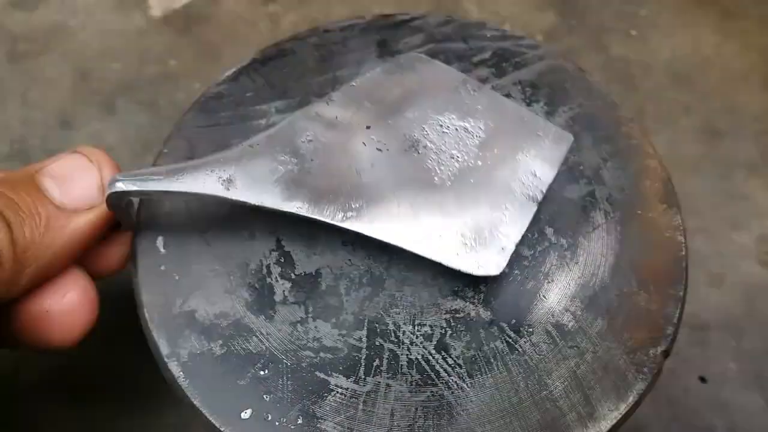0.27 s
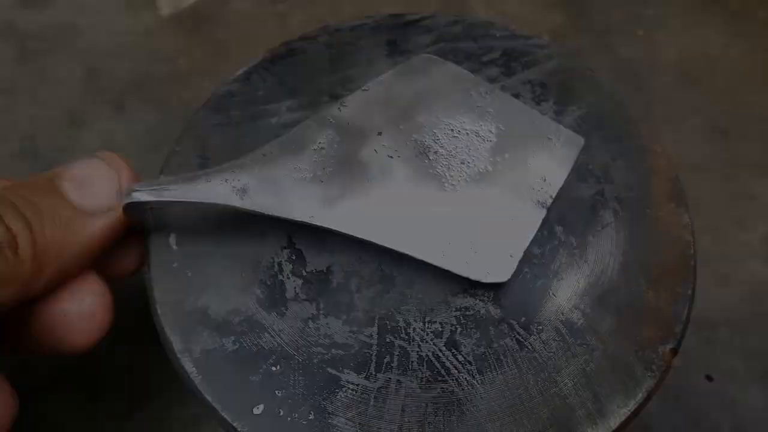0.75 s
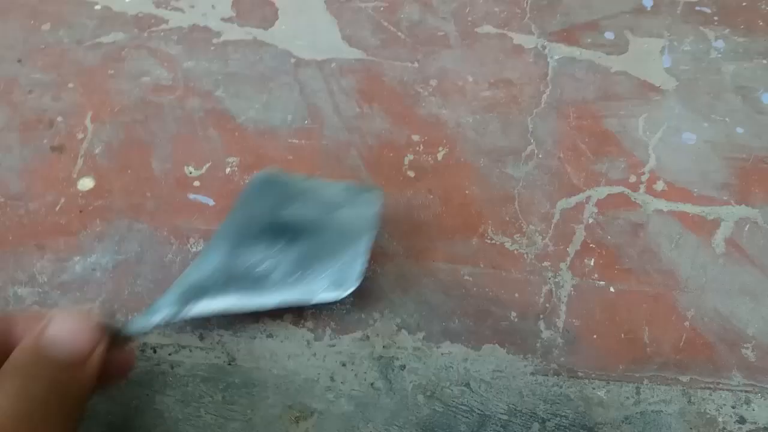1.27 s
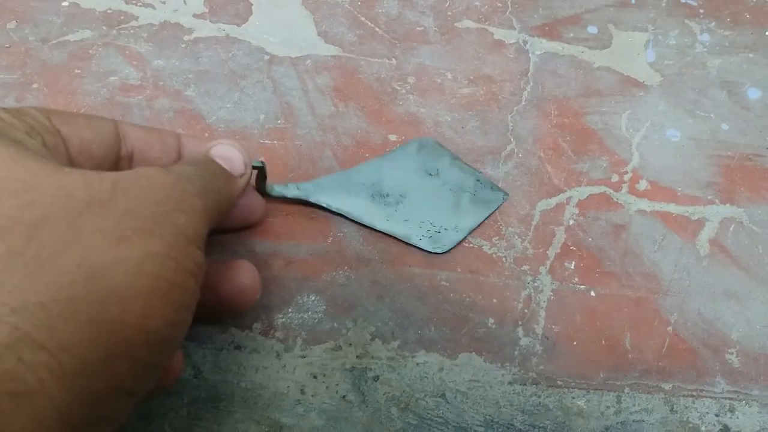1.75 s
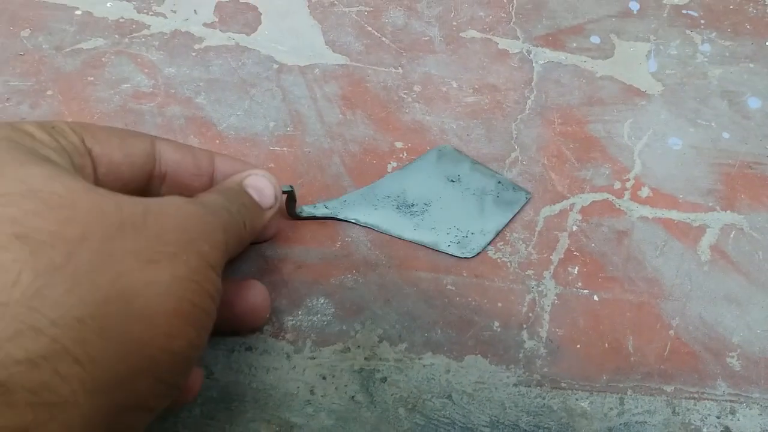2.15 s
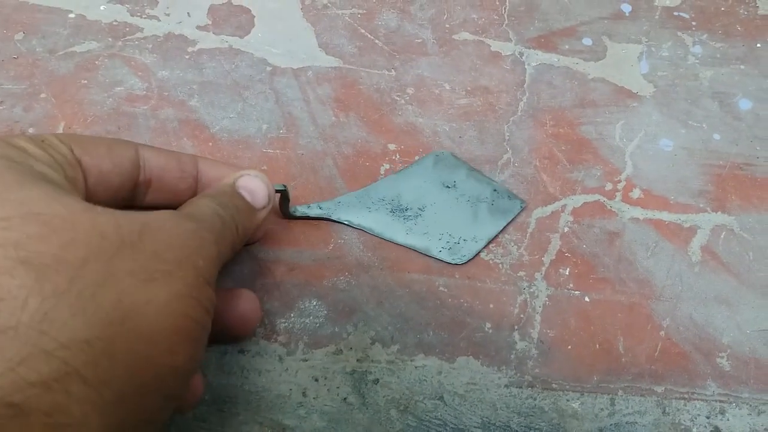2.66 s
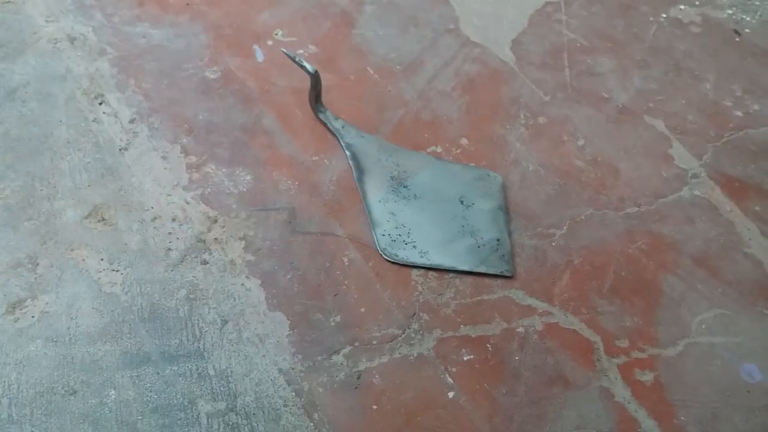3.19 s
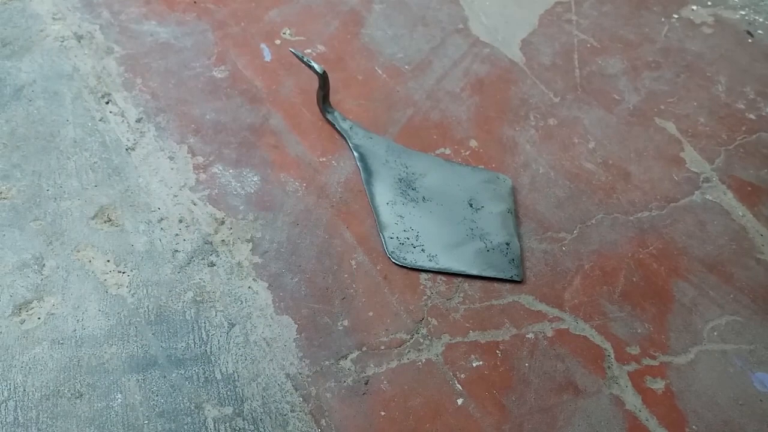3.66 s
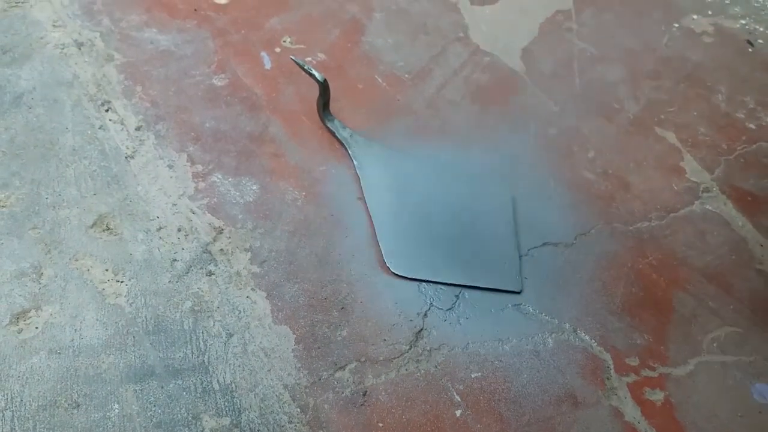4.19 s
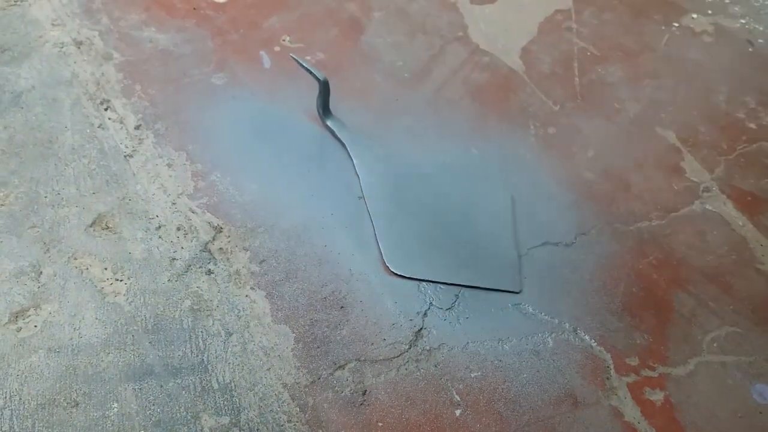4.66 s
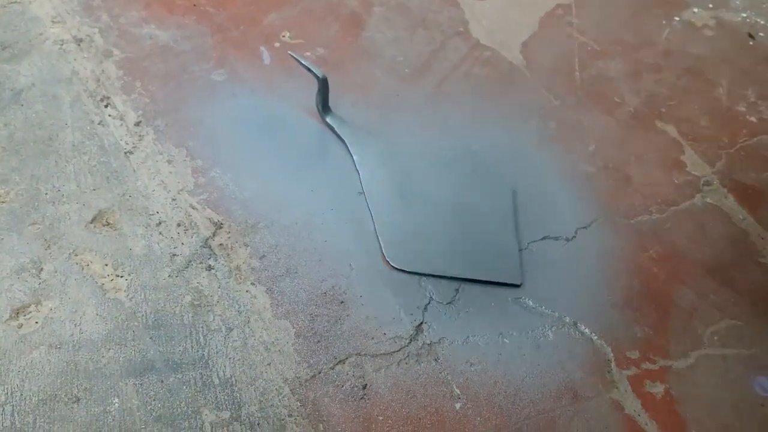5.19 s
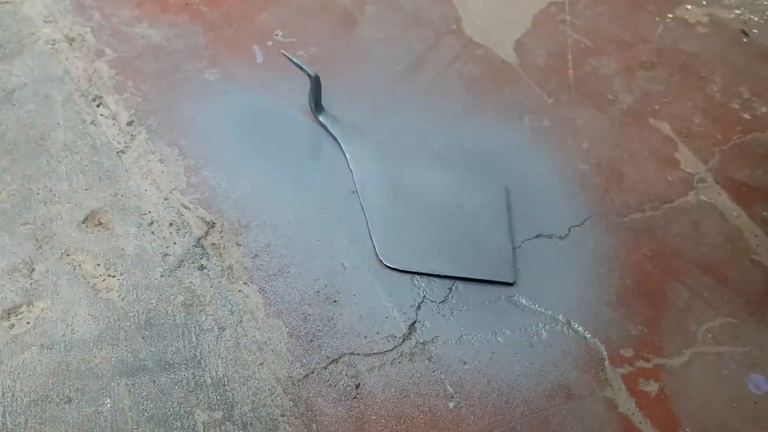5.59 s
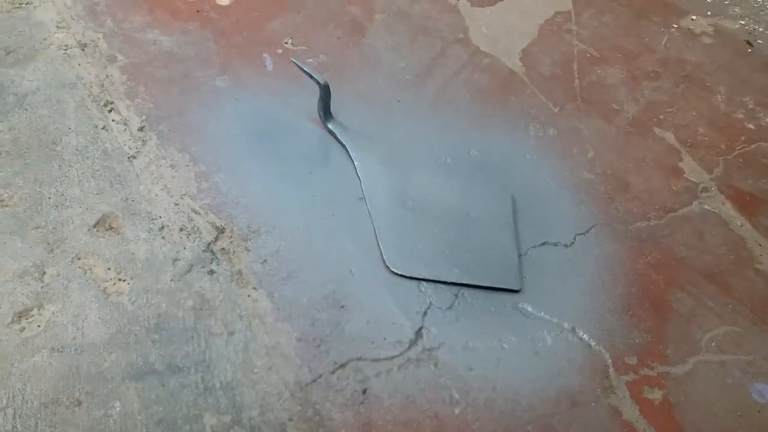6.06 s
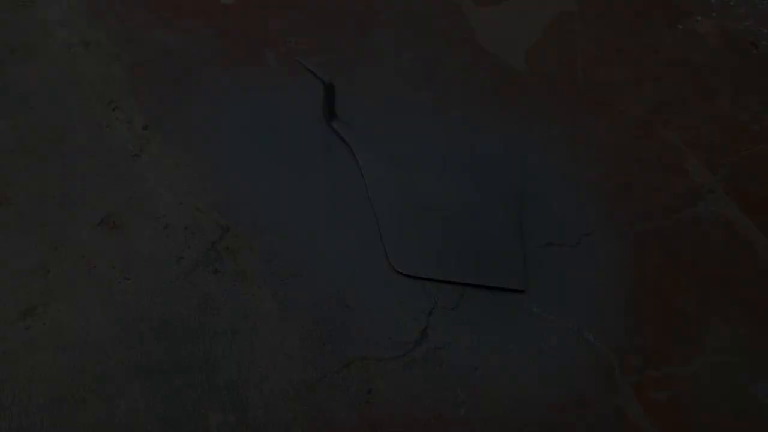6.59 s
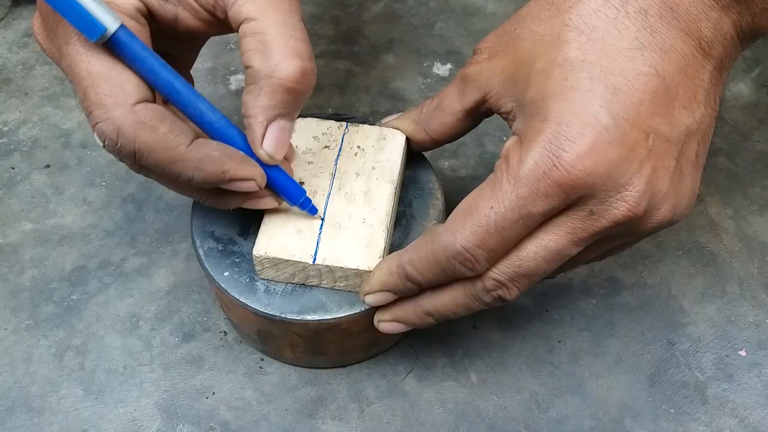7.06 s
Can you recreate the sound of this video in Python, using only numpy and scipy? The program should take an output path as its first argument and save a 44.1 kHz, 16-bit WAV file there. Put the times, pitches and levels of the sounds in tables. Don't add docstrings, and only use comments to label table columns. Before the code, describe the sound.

In a quiet concrete-floored workshop, small metal ticks sound as a flat metal piece is turned. A spray can is shaken in about six strokes, paint sloshing and the mixing ball knocking and rolling. After an abrupt change the nozzle gives a steady turbulent hiss for two seconds, sweeping twice. Hand scuffs and cap ticks follow, then a bare room with a faint fan and insect. Close stereo microphones, low rumble throughout.

```python
import sys
import numpy as np
from scipy import signal
from scipy.fft import rfft, irfft, next_fast_len
from scipy.io import wavfile
from scipy.ndimage import uniform_filter1d

SR = 44100
rng = np.random.default_rng(int(sys.argv[2]) if len(sys.argv) > 2 else 0)


def master_out(mix):
    frames = np.transpose(np.atleast_2d(mix))
    ceiling = np.clip(frames, -1, 1)
    pcm = np.round(ceiling * 32767).astype(np.int16)
    wavfile.write(sys.argv[1], SR, pcm)


def gain_from_decibels(decibels):
    exponent = np.asarray(decibels, float) / 20
    return 10 ** exponent


N = 323496
PADDED = next_fast_len(N + SR // 2)
BINS_HZ = np.fft.rfftfreq(PADDED, 1 / SR)
CUTOFF_HZ = 15850
SCENE_CHANGES_S = 3.172, 6.712

# start t/s, swell/s, peak level/dB, fall/s, fizz level/dB
STROKES = [(0.962, 0.13, -61.5, 0.022, -5), (1.078, 0.08, -32, 0.11, -1.5), (1.235, 0.041, -64, 0.07, 0),
           (1.433, 0.077, -35, 0.092, -4), (1.769, 0.043, -34, 0.095, -13), (2.112, 0.089, -37, 0.071, -3),
           (2.33, 0.018, -71, 0.13, -17), (2.471, 0.081, -35.5, 0.076, 0.5),
           (2.685, 0.0078, -62.5, 0.019, 10), (2.718, 0.0033, -59, 0.02, 8), (2.837, 0.032, -46.5, 0.09, 1),
           (2.828, 0.088, -38, 0.11, 2.5), (3.014, 0.028, -43, 0.063, -11), (3.04, 0.024, -61, 0.032, 24)]
# f/Hz, width/Hz, level/dB
CAN_WALL = [(3160, 120, -20.5), (3640, 130, 6.5), (3866, 330, 3), (4400, 1080, 1.5), (4330, 120, -0.5),
            (4555, 140, -5.5), (5020, 100, -0.5), (5300, 140, 2), (5820, 340, -7.5)]
# f/Hz, left level/dB, right level/dB, left lead/rad, direct share/0-1
SLOSH_PATH = [(587, -19, -21.5, 0.18, 0.65), (983, -32, -32, 0.5, 0.33), (1770, -25, -27, 1.0, 0.96),
              (2380, -20, -12, 4.6, 0.4), (3240, -6.5, -4.5, 3.74, 0.38), (3530, -16.5, -5, 5.3, 0.35),
              (4800, -12.5, -3.5, 7.26, 0.17), (6900, -23.5, -12, 10.4, 0.021),
              (9600, -27, -33.5, 14, 0.089), (10140, -29, -24, 8.4, 0.2), (11540, -26.5, -36.5, 42, 0.08),
              (13800, -27.5, -28.5, 31, 0.2), (15860, -28.5, -23.5, 16, 0.28)]
# t/s, level/dB
ROLL = [
    (1.578, -32),
    (1.599, -54.5),
    (1.63, -42.5),
    (1.687, -37),
    (1.717, -43.5),
    (1.741, -39),
    (1.763, -47),
    (1.78, -36),
]
# t/s, lower f/Hz, lower level/dB, upper f/Hz, upper level/dB
ROLL_MODES = [(1.585, 4330, 1.5, 5900, -1.5), (1.63, 4370, 2, 5930, -4), (1.66, 4330, -8, 5700, -3),
              (1.675, 4170, -2, 5740, -5.5), (1.715, 4210, 0.5, 5300, 3.5), (1.735, 4760, 2, 5300, -3),
              (1.765, 4900, 0, 6030, -4)]
# f/Hz, left level/dB, right level/dB, left lead/rad, direct share/0-1
ROLL_PATH = [(1230, -18, -24, -14.5, 0.35), (1981, -18, -16.5, 4.5, 0.38), (2890, 1, 1.5, -3.5, 0.7),
             (3270, -20.5, -11.5, -3.5, 0.065), (4220, -19.5, 5.5, 7, 1), (4800, -24.5, -2, 8.5, 0.29),
             (5900, -29.5, 3, 8.5, 0.4), (7060, -31, -14, 8, 0.19), (8100, -21, -5, 6.5, 0.5),
             (9190, -4.5, -3, 13.5, 0.87), (10160, -21, -25, 17, 0.93), (11300, -17.5, -20, 12.5, 0.5),
             (12680, -14, -18, 10, 0.54), (16030, -8.5, -11.5, 6.5, 0.31)]

# t/s, jet level/dB
SPRAY = [(3.6, -100), (3.625, -89), (3.644, -64.5), (3.684, -54.5), (3.714, -51), (3.728, -42),
         (3.8, -40.5), (4.08, -41.5), (4.92, -42.5), (5.3, -44), (5.58, -48.5), (5.66, -52.5), (5.8, -87)]
# t/s, place/0 far to 1 near
SWEEP = [(3.68, 0), (3.9, .02), (3.93, .11), (3.97, .03), (4.1, .1), (4.14, .04), (4.18, .55), (4.3, .8),
         (4.42, 1), (4.54, .85), (4.6, .7), (4.66, .3), (4.73, 0), (4.92, .02), (4.96, .1), (5.04, .03),
         (5.14, .7), (5.3, 1), (5.45, .85), (5.62, .35)]
# f/Hz, left level/dB, right level/dB
JET_FAR = [(577, -12.5, -7), (1670, -4.5, -4.5), (1890, 6.5, 1.5), (2600, 6.5, 3.5), (3100, 7.6, 6.5),
           (4200, -0.5, 8.5), (4970, 2.5, 0.7), (5700, -5, 12), (6720, 4, -3), (7670, -4.5, 5.5),
           (8400, 4, -16), (9400, -8, 1.5), (9900, -6, 1), (10200, -3, 2), (11530, 2.5, 0.5),
           (13510, 2.5, -15), (13670, -25, 16), (14400, 9.5, -0.5), (16240, 1.5, -28)]
JET_NEAR = [(586, -3.5, -10.5), (1600, -4.5, -1.5), (1804, 12.5, 0.5), (2700, 13, 10.5), (3180, 4, 4.5),
            (4200, -12, 14.5), (4900, 4, -6), (5700, 2, -2.5), (6460, 18.5, -1), (7600, -17, 9.5),
            (8400, 3.5, -4), (9800, -2, 5.5), (10230, 12.5, -11.5), (10800, 3, -14), (11300, 3, 7.5),
            (13450, 8, -8), (13840, 11.5, 0), (15200, 2, 2), (15700, 5, -15)]
# f/Hz, left lead/rad, direct share/0-1
LAG_FAR = [(1500, -.6, .7), (2430, -2, .85), (2590, -3.14, 1), (2810, -3.14, 1), (2980, -1.5, .5),
           (3620, -3, .95), (3850, -2, .95), (4250, -3.2, .96), (4700, -1.8, .6), (5200, -3, .998),
           (6250, -3.35, .998), (6800, -4.7, .97), (7300, -6.2, .75), (8500, -9.3, .88),
           (9500, -12.56, .96), (10800, -15.2, .85), (12000, -13, .6), (14200, -15.7, .9),
           (15600, -15.7, .85)]
LAG_NEAR = [(1500, -.5, .7), (2400, -1.3, .7), (2590, -2.5, .97), (2810, -2.5, .97), (2980, -.8, .6),
            (3350, 0, .9), (3800, -3.45, 1), (4200, -3.2, 1), (4600, 0, .9), (5300, 0, .9),
            (6200, -2.3, .99), (6900, -3, .99), (8000, -6.28, .85), (8600, -8.9, .97), (9100, -9.6, .97),
            (10200, -12.6, .8), (11500, -15.2, .75), (12700, -12.8, .6), (13700, -15.4, .6),
            (15600, -13.3, .4)]
# t/s, level against the jet/dB
SCATTER = [(3.6, -3), (3.7, -8), (3.75, -30), (4.33, -26), (4.42, -11), (4.5, -28), (4.62, -16),
           (4.74, -22), (4.88, -20), (4.92, -30), (5.05, -30), (5.1, -14), (5.17, -28), (5.42, -24),
           (5.5, -9), (5.8, -6)]
# f/Hz, level/dB per Hz
JET_GUST = [(53, -47), (90, -64), (129, -7.5), (198, -1), (384, -4.5), (575, -17.5), (626, -44), (700, -20),
            (910, -61.5), (1540, -120)]

# start t/s, swell/s, peak level/dB, fall/s, hollow ring level/dB
HANDLING = [
    (3.15, 0.018, -60.5, 0.044, -11),
    (5.655, 0.017, -49.5, 0.085, 3.5),
    (5.7, 0.058, -54.5, 0.055, 1.5),
    (5.797, 0.062, -47, 0.092, -15),
    (6.179, 0.028, -55, 0.14, -25),
    (6.24, 0.025, -60, 0.068, -11.5),
    (6.314, 0.023, -54.5, 0.057, -17),
    (6.585, 0.004, -64, 0.024, -11),
    (6.61, .005, -66, 0.073, -14),
    (6.641, 0.055, -64.5, 0.2, 7),
]
# f/Hz, left level/dB, right level/dB, left lead/rad, direct share/0-1
HANDLING_PATH = [(700, -7.5, -22, 0.58, 0.6), (1530, -15.0, -23, 2.4, 0.009), (1884, -5.5, -9, 0.71, 0.64),
                 (2680, 0.5, -1.0, 5.2, 1.0), (3560, 0.5, -1.0, 6.4, 0.48), (4440, -10.5, -7.5, 4.6, 0.19),
                 (5300, -2.0, -6.0, 9.7, 0.27), (6500, -8.5, -5.5, 13.0, 0.78),
                 (7500, -6.5, -12, 15.2, 0.15), (11340, -7.0, -11.0, 17.0, 0.25),
                 (15760, -12.0, -19, 10.0, 0.1)]

# t/s, peak level/dB, ring f/Hz, treble crack level/dB, left-right level/dB
TURNING_TICKS = [(0.0379, -54, 4330, -10.5, -20), (0.301, -64.5, 4480, 5, -8),
                 (0.514, -41.5, 4850, -41, -5), (0.83, -57.5, 4260, -19, -15), (0.846, -64, 4300, -6, -9),
                 (0.8647, -58, 4180, -15, -22), (0.882, -62, 4350, -4, -4.0), (0.8984, -61, 4200, -13, -21),
                 (0.912, -70, 4400, 2, -8), (0.924, -62, 4300, -10, -12), (0.954, -62, 4180, -5, -11),
                 (0.972, -56, 5500, -14, -8), (0.997, -59, 4000, -17, -8), (1.021, -56, 3560, -21, -6), ]
# t/s, peak level/dB, ring f/Hz, crack level/dB, left-right
# level/dB
BALL_TICKS = [(1.153, -36.5, 700, -4, -1), (1.5743, -28.5, 4370, -2.5, -5), (1.582, -48, 4300, -14, -10),
              (1.6367, -47, 5900, -15, -6), (1.6497, -43, 5650, -18, -11), (1.655, -46, 5590, -18, -9),
              (1.668, -37, 4220, -20, -7), (1.6877, -36, 4150, -14, -10), (1.695, -42.5, 5620, -4, -8),
              (1.73, -44, 4800, -8, -8), (1.74, -45, 4800, -12, -4), (1.759, -45, 5800, -9.5, -3),
              (2.8603, -40, 3690, -29, -2), (2.885, -32, 3650, -32, -7), (2.942, -37, 3410, -18, 0)]
# t/s, peak level/dB, ring f/Hz, crack level/dB, left-right level/dB
DROP_TICKS = [(1.879, -45.5, 4360, -2, -1), (1.9144, -39, 4020, -11, -7), (1.944, -43, 5560, -4, 4),
              (2.081, -51.5, 3900, -5.5, -7), (2.097, -63, 4200, 0, -3), (2.114, -47, 3900, -38, 7),
              (2.397, -48.5, 3640, -8, -5), (2.6976, -47.5, 3800, -10, -4), (2.727, -54, 3560, -9, -7),
              (3.1568, -57, 3270, -1, 3.5), (3.169, -55, 3230, -12, 15)]
# t/s, peak level/dB, ring f/Hz, crack level/dB, left-right level/dB
NOZZLE_TICKS = [
    (3.4692, -60, 4460, -21, -2),
    (3.5766, -65, 2700, -23, 0),
    (3.627, -67, 5700, 8, 0),
    (5.757, -44, 2600, -14, 3),
    (6.421, -66, 2600, -27, -2),
    (6.4334, -58, 2800, -35, -10),
    (6.446, -63, 5900, -18, -9),
    (6.587, -59, 3270, -18, -4),
    (6.6143, -66, 2920, -13, 0.5),
    (6.643, -55, 2900, 1.5, 1),
]
# ring gain, ring t60/s, puff gain, puff t60/s
TICK_KINDS = [
    (.85, .012, .9, .012),
    (.87, .013, .6, .026),
    (.5, .008, .9, .034),
    (.6, .012, .6, .026),
]

# f/Hz, level/dB per Hz
RUMBLE = [(35, -43), (60, -15.5), (70, -29), (130, 1), (200, -1.5), (404, -6), (504, -43.5), (600, -21),
          (780, -26), (1320, -120)]
# f/Hz, width/Hz, level/dB
ROOM_MODES = [(80, 9, 9), (131, 10, 5), (195, 10, 1), (290, 16, 0), (630, 40, 0)]
# f/Hz, level/dB per Hz
AIR = [(300, -27), (450, -1), (650, -3), (850, -3.5), (1150, -3.5), (1500, -7), (2000, -7.5), (5500, -16.5),
       (8500, -25), (9100, -24), (11900, -24.5), (12200, -47), (15800, -68.5)]
# f/Hz, likeness/0-1
AIR_LIKENESS = [(60, 0.99), (200, 0.96), (500, 0.75), (1500, 0.069), (4000, 0.016)]
# start t/s, rumble level/dB, rumble growth/dB per s, air level/dB, lowest wave level/dB
STRETCHES = [
    (0, -63.5, -1, -75.5, -88),
    (0.961, -55.5, -3, -74.5, -68.5),
    (3.172, -67.5, 2, -80.5, -76),
    (6.712, -66, -1, -76, -80),
]


def slosh():
    fizz_hz, thud_hz, turns_per_s = 7000, 3000, 7.3
    splash = grains(6000, spread_db=3.0, clump_db=0.96)
    gains = stroke_gains()
    wall = 0
    for k, (hz, width_hz, db) in enumerate(CAN_WALL):
        wall = wall + gain_from_decibels(db) * resonate(splash, hz, width_hz) * (-1) ** k
    hardness = (gains.sum(axis=0) / gains.max()) ** 0.4
    body = splash + gain_from_decibels(5.0) * wall * hardness

    fizz = signal.sosfilt(signal.butter(4, fizz_hz, "high", fs=SR, output="sos"), body)
    thud = signal.sosfilt(signal.butter(2, thud_hz, fs=SR, output="sos"), body)
    core = body - fizz - thud
    effort = np.maximum(gains / gains.max(axis=1, keepdims=True), 0.29)
    fizz_gains = gains * gain_from_decibels(np.array(STROKES)[:, 4:]) * effort ** 0.13
    thud_gains = gains * effort ** 0.4
    stroke = gains.sum(axis=0) * core + fizz_gains.sum(axis=0) * fizz + thud_gains.sum(axis=0) * thud

    path, out = at_level(SLOSH_PATH), 0
    turns = turns_per_s * np.arange(N) / SR
    for first in range(3):
        facing = (1 + np.cos(2 * np.pi * (turns + first / 3))) / 3
        out = out + arrive(facing * stroke, path, reflections(0.067), focus=0.5)
    return gain_from_decibels(4.0) * out


def stroke_gains():
    return bursts(STROKES, onset_db=12.5, curve=0.92, tail_db=-20.5, tail_db_per_s=76.5)


def roll():
    grit = rms_one(rng.standard_normal(N) + .5 * grains(7300, spread_db=11.0, clump_db=6.0))
    song = 0
    for k, width_hz in enumerate((180, 320)):
        mode = gliding(in_time(ROLL_MODES, column=2 * k + 1), width_hz)
        song = song + gain_from_decibels(in_time(ROLL_MODES, column=2 * k + 2)) * mode
    source = envelope(ROLL) * (grit + gain_from_decibels(1.3 * drift(40) - 8) * song)
    return gain_from_decibels(-8.0) * arrive(source, at_level(ROLL_PATH), reflections(0.039), focus=0.57)


def spray():
    jet = rms_one(rng.standard_normal(N) + 0.47 * grains(3000, spread_db=4.5, clump_db=3.5))
    flow = envelope(SPRAY)
    jet = jet * flow * gain_from_decibels(0.8 * drift(25) + 0.46 * drift(40))
    far, near = at_level(JET_FAR, LAG_FAR), at_level(JET_NEAR, LAG_NEAR)
    for path in (far, near):
        path[:2] += path[3] ** 6 * (path[:2].mean(axis=0) - path[:2])

    echoes, place, out = reflections(.03), nozzle_place(), 0
    for step in np.linspace(0, 1, 6):
        weight = np.maximum(0, 1 - 5 * np.abs(place - step))
        moved = echoes * np.exp(-2j * np.pi * np.fft.rfftfreq(PADDED) * 6.6 * step)
        out = out + weight * arrive(jet, far + step * (near - far), moved, focus=.7)

    scatter = rms_one(rng.standard_normal(N)) * flow * envelope(SCATTER)
    out = out + arrive(scatter, (far + near) / 2, echoes[::-1], focus=40)
    return gain_from_decibels(4.5) * out + gust(flow)


def nozzle_place():
    return np.clip(in_time(SWEEP) + .03 * drift(6), 0, 1)


def gust(flow):
    level_db, follows, lag_s, head_start_s = -51, 0.88, 0.24, 0.16
    push = np.roll(flow / flow.max(), -round(head_start_s * SR))
    return gain_from_decibels(level_db + drift(4.1)) * linger(push, lag_s) ** follows * diffuse(JET_GUST)


def handling():
    gains = scuff_gains()
    grit = grains(7000, spread_db=6.0, clump_db=2.0)
    hollow_gain = (gains * gain_from_decibels(np.array(HANDLING)[:, 4:])).max(axis=0)
    hollow = hollow_gain * resonate(grit, 2850, width_hz=470)
    source = gains.max(axis=0) * grit + 1.46 * hollow
    return gain_from_decibels(1.0) * arrive(source, at_level(HANDLING_PATH), reflections(0.036), focus=0.94)


def scuff_gains():
    return bursts(HANDLING, onset_db=14.5, curve=0.64)


def ticks():
    out, t = np.zeros((2, N)), np.arange(SR // 25) / SR
    crack_band = signal.butter(2, [7000, 12500], "band", fs=SR, output="sos")
    puff_band = signal.butter(2, [2000, 7000], "band", fs=SR, output="sos")
    families = TURNING_TICKS, BALL_TICKS, DROP_TICKS, NOZZLE_TICKS
    for family, (ring_gain, ring_t60, puff_gain, puff_t60) in zip(families, TICK_KINDS):
        for s, db, hz, crack_db, pan_db in family:
            crack = signal.sosfilt(crack_band, rng.standard_normal((2, len(t))))
            puff = signal.sosfilt(puff_band, rng.standard_normal((2, len(t))))
            overtone = gain_from_decibels(crack_db + 1.5) * np.sin(2 * np.pi * 2.05 * hz * t)
            ring = (np.sin(2 * np.pi * hz * t) + overtone) * gain_from_decibels(-60 * t / ring_t60)
            noise = (puff_gain * puff + gain_from_decibels(crack_db) * crack) * gain_from_decibels(-60 * t / puff_t60)
            pan = gain_from_decibels(db + pan_db * np.array([[.5], [-.5]]))
            i = round(s * SR)
            out[:, i:i + len(t)] += pan * (ring_gain * ring + noise)
    return out


def room():
    t = np.arange(N) / SR
    low = .45 * diffuse(RUMBLE)
    source = low / .45
    for k, (hz, width_hz, db) in enumerate(ROOM_MODES):
        low = low + gain_from_decibels(db) * resonate(source, hz, width_hz) * (-1) ** k
    low = rms_one(low)
    columns = np.transpose(STRETCHES)
    start, rumble_db, growth, air_db, deep_db = columns[:, np.searchsorted(columns[0, 1:], t)]

    shake = (stroke_gains().max(axis=0) + envelope(ROLL)) * (t < SCENE_CHANGES_S[0])
    # (rumble dB, air dB)
    movers = [(shake, (-33, -43)), (envelope(SPRAY), (-41, -43.5)),
              (scuff_gains().max(axis=0), (-32.5, -46.5))]
    follows, settles_s = 0.49, 0.021
    stirred = 0
    for gain, db in movers:
        stirred = stirred + gain_from_decibels(2 * np.array(db))[:, None] * linger(gain, settles_s) ** (2 * follows)
    resting = gain_from_decibels(2 * np.array([rumble_db + growth * (t - start), air_db]))
    rumble, hiss = np.sqrt(resting + stirred)

    rumble = rumble * gain_from_decibels(-1.0 + 1.0 * drift(16) + drift(0.84)) * low
    air = hiss * gain_from_decibels(5.0 + 1.1 * drift(10.0)) * diffuse(AIR)
    deep = resonate(rng.standard_normal(N), *ROOM_MODES[0][:2])
    deep = gain_from_decibels(deep_db) * rms_one(resonate(deep, 84, width_hz=13))
    bare = t > SCENE_CHANGES_S[1]
    return rumble + deep + air + bare * (fan() + insect())


def fan():
    return gain_from_decibels(-78) * rms_one(resonate(rng.standard_normal((2, N)), 1140, width_hz=290))


def insect():
    hz, width_hz, level_db, chirps_per_s, depth_db = 13800, 700, -92, 13, 23
    t = np.arange(N) / SR
    rasp = resonate(resonate(rng.standard_normal((2, N)), hz, width_hz), hz, width_hz)
    throb = np.sin(np.pi * chirps_per_s * t + 0.65 * drift(5.5)) ** 2
    return gain_from_decibels(level_db - depth_db * throb) * rms_one(rasp)


def diffuse(spectrum):
    mid, side = rfft(rng.standard_normal((2, PADDED))) * gain_from_decibels(on_bins(spectrum))
    alike = np.clip(on_bins(AIR_LIKENESS)[0], 0, 1)
    both = np.sqrt(1 + alike) * mid + np.sqrt(1 - alike) * side * np.array([[1], [-1]])
    return rms_one(irfft(both, PADDED)[:, :N])


def reflections(t60):
    tail = rng.standard_normal((2, SR // 2)) * gain_from_decibels(-60 * np.arange(SR // 2) / SR / t60)
    return rfft(tail / np.sqrt(np.sum(tail ** 2, axis=1, keepdims=True)), PADDED)


def arrive(x, path, echoes, focus):
    left_db, right_db, lead, share = path
    share = np.clip(share, 0, 1) ** focus
    direct = np.exp(.5j * lead * np.array([[1], [-1]]))
    colour = gain_from_decibels(np.array([left_db, right_db]))
    heard = colour * (np.sqrt(share) * direct + np.sqrt(1 - share) * echoes)
    return irfft(rfft(x, PADDED) * heard, PADDED)[:, :N]


def at_level(path, lag=()):
    foot = (path[0][0] * 0.59, -60, -60) + tuple(path[0][3:])
    bins = on_bins([foot] + list(path))
    bins[:2] -= np.clip(BINS_HZ - CUTOFF_HZ, 0, 900) / 10
    bins[:2] -= 10 * np.log10(np.mean(gain_from_decibels(bins[:2]) ** 2))
    return np.vstack([bins, on_bins(lag)]) if lag else bins


def on_bins(rows):
    hz, *columns = np.transpose(rows)
    bins = np.log(BINS_HZ + 1)
    return np.array([np.interp(bins, np.log(hz), c) for c in columns])


def bursts(rows, onset_db, curve, tail_db=-90, tail_db_per_s=100):
    out = np.zeros((len(rows), N))
    for gain, (s, swell, db, fall, *_) in zip(out, rows):
        i = round(s * SR)
        u = np.arange(min(SR // 2, N - i)) / SR
        after = np.maximum(u - swell, 0)
        rise = -onset_db * (1 - np.minimum(u / swell, 1) ** curve)
        decay = np.maximum(-30 * after / fall, tail_db - tail_db_per_s * after)
        crest = max(round(min(0.024, swell) * SR), 1)
        shape_db = uniform_filter1d(rise + decay, size=crest, mode="nearest")
        gain[i:i + len(u)] = gain_from_decibels(db + shape_db) * np.minimum(u / 0.0056, 1)
    return out


def grains(per_s, spread_db, clump_db):
    sizes = gain_from_decibels(spread_db * np.minimum(rng.exponential(1, N), 3.5)) * rng.choice([-1, 1], N)
    return rms_one(sizes * (rng.random(N) < per_s * gain_from_decibels(clump_db * drift(60)) / SR))


def resonate(x, hz, width_hz):
    r = np.exp(-np.pi * width_hz / SR)
    poles = [1, -2 * r * np.cos(2 * np.pi * hz / SR), r * r]
    return signal.lfilter([(1 - r * r) / 2, 0, (r * r - 1) / 2], poles, x)


def gliding(hz, width_hz):
    r = np.exp(-np.pi * width_hz / SR)
    a, b = signal.lfilter([1], [1, -r], rng.standard_normal((2, N)))
    turn = 2 * np.pi * np.cumsum(hz) / SR
    return rms_one(a * np.cos(turn) + b * np.sin(turn))


def drift(rate):
    r = np.exp(-80 * np.pi * rate / SR)
    slow = signal.lfilter([1], [1, -2 * r, r * r], rng.standard_normal(N // 40 + 2002))[2000:]
    return np.interp(np.arange(N) / 40, np.arange(len(slow)), rms_one(slow))


def linger(x, seconds):
    r = np.exp(-1 / (seconds * SR))
    return signal.lfilter([1 - r], [1, -r], x + 1e-18)


def in_time(rows, column=1):
    rows = np.array(rows, float)
    return np.interp(np.arange(N) / SR, rows[:, 0], rows[:, column])


def envelope(rows):
    t = np.arange(N) / SR
    inside = (t >= rows[0][0]) * (t <= rows[-1][0])
    return uniform_filter1d(gain_from_decibels(in_time(rows)) * inside, size=90)


def rms_one(x):
    return x / np.sqrt(np.mean(x ** 2) + 1e-20)


def scene():
    t = np.arange(N) / SR
    first, second = SCENE_CHANGES_S
    shaking = (slosh() + roll()) * (t < first)
    small = handling() * (t < second) + ticks()
    small = small * ((t < first + .004) | (t > first + .2))
    return shaking + spray() + small + room()


def band_limit(x):
    return signal.sosfilt(signal.butter(12, 16620, fs=SR, output="sos"), x)


def record(dry):
    x = signal.sosfilt(signal.butter(8, 70, "high", fs=SR, output="sos"), dry)
    flicker_band = signal.butter(2, [15, 55], "band", fs=SR, output="sos")
    x = x + gain_from_decibels(-86) * rms_one(signal.sosfilt(flicker_band, rng.standard_normal((2, N))))
    x = signal.sosfilt(signal.ellip(8, 1, 70, CUTOFF_HZ, fs=SR, output="sos"), x) - .0003
    return band_limit(x)


dry = scene()
out = record(dry)
master_out(out)
```